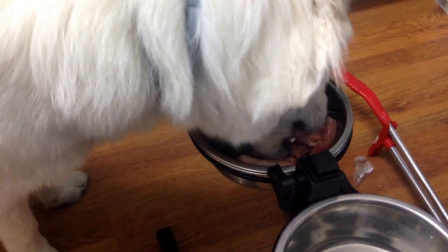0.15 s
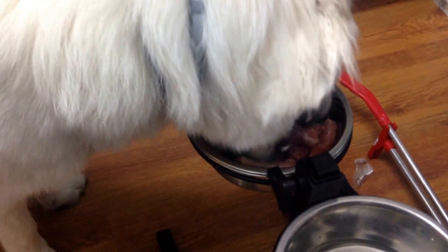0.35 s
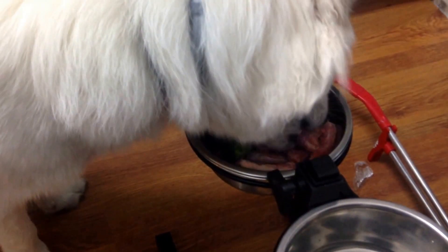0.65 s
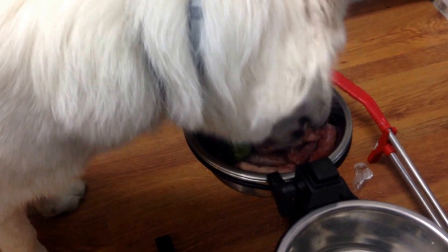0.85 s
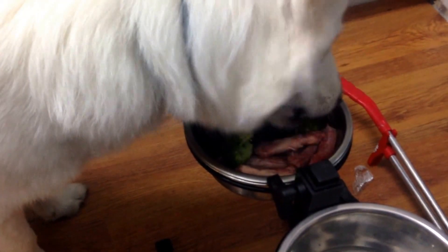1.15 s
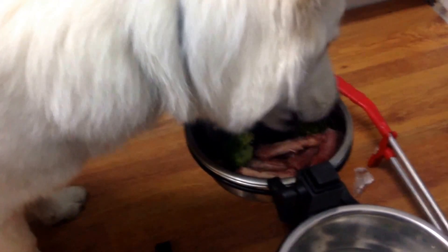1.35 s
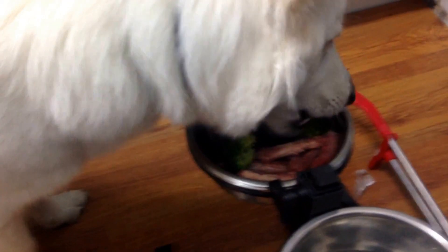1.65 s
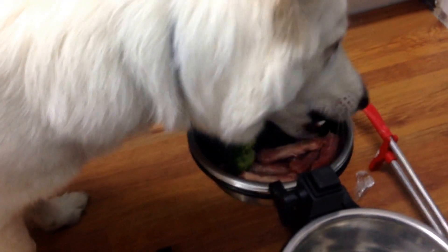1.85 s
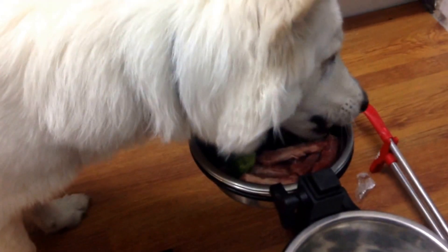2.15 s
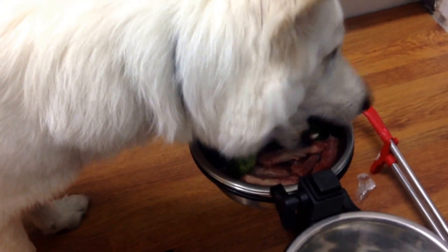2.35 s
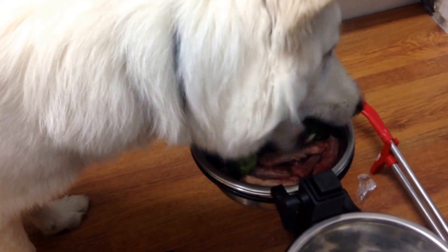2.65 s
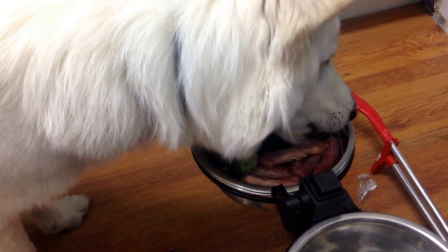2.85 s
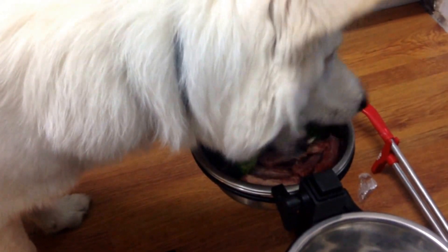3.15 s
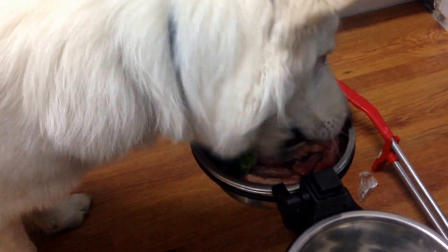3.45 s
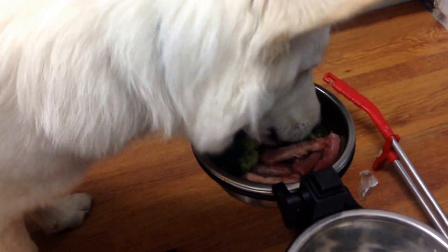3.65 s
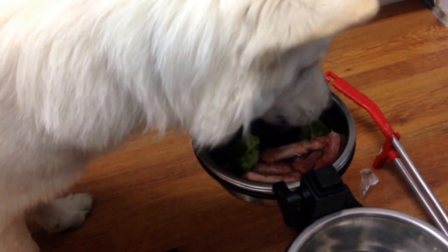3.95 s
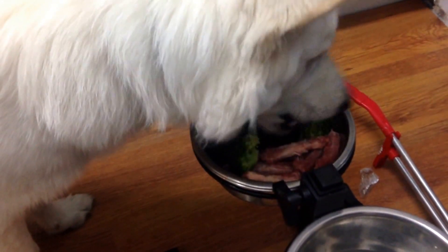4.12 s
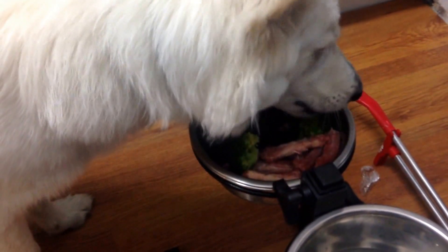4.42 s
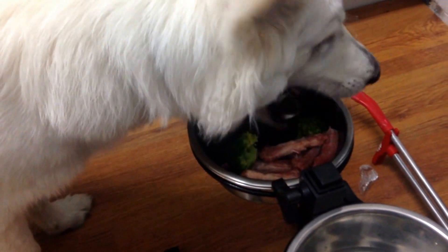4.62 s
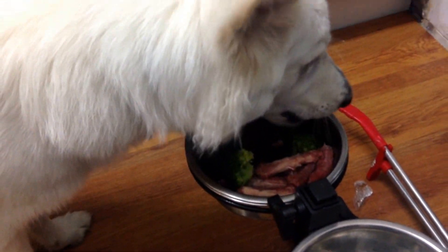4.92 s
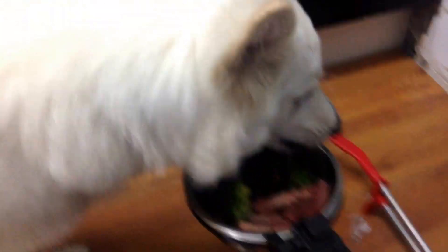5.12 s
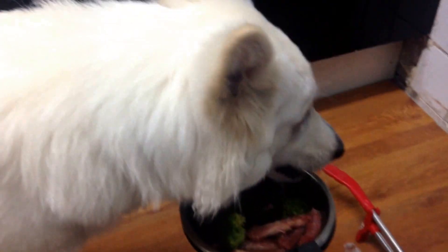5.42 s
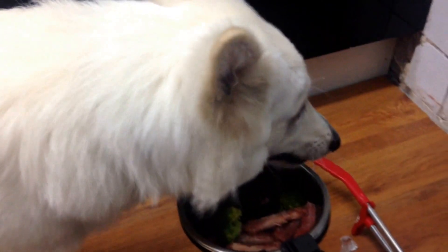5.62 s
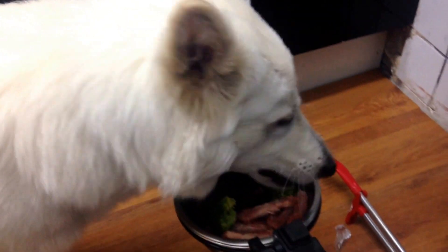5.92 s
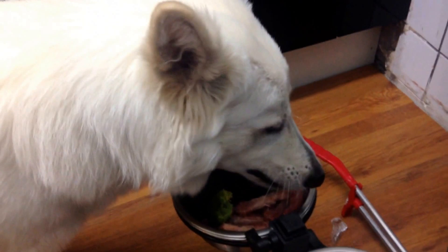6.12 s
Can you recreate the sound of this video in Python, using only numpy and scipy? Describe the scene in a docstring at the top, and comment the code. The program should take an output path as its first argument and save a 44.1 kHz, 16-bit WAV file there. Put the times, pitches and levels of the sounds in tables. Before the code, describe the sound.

A dog eats moist raw meat from a steel bowl on a wooden floor, close up in a small, hard, briefly reverberant room. Steady soft hiss and low room air lie beneath. From 0 to 1.6 s the mouthing is quiet and sparse: fine wet crackle, light lip clicks, faint bumps and hollow tongue pops at about 0.4, 0.8, 1.2 and 1.4 s. At 1.9-2.2 s sharper wet snaps arrive, strongest at 2.1. After a lull, a dense run of juicy bites with a pop fills 2.8-3.1 s. Small ticks and smacks follow until 4.45 s, when one hollow pop and snap bursts out, by far the loudest, followed by dull low thumps around 4.65 s. Soft mouthing resumes; quick crisp bites cluster at 5.4-5.7 s, then two wet snaps near 6.05 and 6.13 s and soft low bumps close it. The bowl rings only faintly.

```python
"""Dog eating raw meat from a steel bowl

A dog eats from a steel bowl on a wooden floor, heard from close by in a small hard room.
Bites are noise clicks shaped by a filter, with damped resonances of the mouth cavity and jaw.
Suction pops, small tongue smacks and dull bumps are damped resonances too; the moist food crackles
as a dense shower of tiny ones. The bowl rings faintly as a bank of decaying modes, two sets of
dense decaying reflections form the room, and filtered noise makes the steady hiss."""
import sys
import numpy as np
from scipy import signal
from scipy.fft import rfft, irfft
from scipy.io import wavfile

SR = 44100
rng = np.random.default_rng(int(sys.argv[2]) if len(sys.argv) > 2 else 0)


def waveform_to_disk(signal):
    """Save audio, clipped to [-1, 1], as 16-bit WAV at the path in sys.argv[1]."""
    frames = np.transpose(np.atleast_2d(signal))
    scaled = np.clip(frames, -1, 1) * 32767
    samples = np.round(scaled).astype(np.int16)
    wavfile.write(sys.argv[1], SR, samples)


N = 276948  # length in samples

# Room air and microphone hiss, relative spectral density: frequency_hz, level_db_per_hz
HISS_SPECTRUM = [(18, -23), (35, -6), (62, -0.5), (100, -3), (175, 1), (350, -3.5), (700, -9), (1300, -19),
                 (2200, -14.5), (4300, -11), (7000, -13), (15000, -14.5)]
# Decay time of the room in each band: frequency_hz, t60_s
ROOM_DECAY = [(150, 0.6), (500, 0.23), (1400, 0.41), (3700, 0.34), (9000, 0.31), (15000, 0.21)]
# Relative strength of the room's tail in each band: frequency_hz, level_db
ROOM_STRENGTH = [(150, -2), (350, -0.5), (620, 0), (880, -7), (1250, -3), (1800, -3.5), (2700, -2.5),
                 (4000, -3), (9000, -3), (15000, -5)]
# Modes of the steel bowl, damped by the food in it: pitch_hz, relative_level_db, t60_s
BOWL_MODES = [(818, -26, 0.32), (886, -17.5, 0.49), (1176, -18, 0.37), (1240, -38, 0.9), (1486, -14.5, 0.2),
              (1630, -55, .3), (1850, -23, 0.25), (1850, -21, 0.18), (2170, -16, 0.12), (2850, -22.5, 0.17),
              (4440, -26, 0.23)]
# Dull low bumps: start_s, level_db, pitch_hz, settle_by_20_db_s
BUMP_EVENTS = [(.136, -54, 74, .04), (.241, -62, 240, .04), (.779, -64, 208, .02), (.921, -61, 78, .05),
               (2.169, -56, 200, .04), (4.4505, -50.5, 165, .025), (4.655, -52.5, 310, .05),
               (4.668, -47.5, 190, .14), (4.678, -48.5, 64, .22), (5.875, -58.5, 75, .04),
               (6.095, -56, 54, .35), (6.167, -57.5, 208, .07)]
# Effort of the jaw on the moist food: time_s, level_db
CHEWING_EFFORT = [(0, -77), (.2, -64), (.55, -80), (1.35, -70), (1.7, -77), (2.08, -65), (2.6, -79),
                  (2.8, -66), (3.3, -75), (3.8, -68), (4.1, -70), (4.55, -62.5), (4.98, -72), (5.2, -66.5),
                  (5.47, -69), (5.62, -57), (5.8, -70), (6.28, -62)]
# Relative colour of the crackle: frequency_hz, level_db
CRACKLE_COLOUR = [(750, 2), (900, 3), (1300, -5.5), (1800, 1.5), (3300, -4), (7000, -8.5), (15000, -19.5)]
# Tongue and cheeks pulling free: start_s, level_db, cavity_pitch_hz
POP_EVENTS = [(.371, -49.5, 930), (.7797, -46.5, 876), (1.1686, -52.5, 946), (1.4461, -52, 910),
              (2.754, -60.5, 1350), (2.9048, -48, 1050), (3.476, -64, 906), (3.6034, -58, 1020),
              (4.38, -56.5, 1150), (4.451, -27, 910), (4.828, -59, 1840), (4.856, -59, 940),
              (5.086, -55.5, 1450), (5.957, -60.5, 814)]
# Relative colour of a wet snap: frequency_hz, level_db
SNAP_COLOUR = [(1000, -2), (2000, -0.5), (3500, 1), (5500, 1), (8000, -0.5), (11000, -2), (15000, -5.5)]
# Teeth and lips: start_s, snap_level_db, snap_low_edge_hz, slope_db_per_octave, mouth_pitch_hz
BITE_EVENTS = [ (.1611, -50.5, 1400, -6, 3020), (.451, -54.5, 1400, 3.5, 6100),
               (.704, -59, 1590, -4.5, 850), (.865, -61.5, 2500, -2, 3200), (.999, -61, 1410, -.5, 2850),
               (1.355, -62, 1700, -12, 800), (1.838, -57, 1500, 4, 640), (1.9, -55, 1750, -7.5, 3200),
               (1.9267, -47, 2000, -14.5, 3000), (1.951, -59, 1400, -12, 970),
               (2.0992, -37, 1750, -8.5, 1787), (2.168, -43.5, 1000, -8.5, 940),
               (2.18, -50.5, 1070, -3.5, 860), (2.213, -56, 4000, -13, 4620),
               (2.4541, -52, 3700, -10, 1820), (2.486, -59, 1000, -4, 1780), (2.803, -54, 1500, 14, 1830),
               (2.9159, -42, 1800, -12, 1174), (2.9426, -39, 1200, -6, 1980),
               (2.9505, -34, 1800, -7.5, 1760), (2.966, -46, 1100, -9, 1000),
               (3.008, -41.5, 1100, -9, 1100), (3.034, -51, 1800, -14, 2400), (3.1051, -43, 2300, 0, 2696),
               (3.334, -59, 1470, 1, 4480), (3.549, -58.5, 1500, 0, 4670), (3.673, -56, 3700, -13, 3540),
               (3.9313, -50.5, 2300, -18, 2450), (4.2127, -60.5, 900, -4.5, 3330),
               (4.294, -58, 1540, -3, 1900), (4.4503, -30, 1450, -10.5, 5830),
               (4.4747, -43.5, 1010, -10, 1204), (4.536, -46, 1700, -14, 1850),
               (5.0156, -57.5, 920, -9.5, 886), (5.099, -59, 4060, -5, 1020),
               (5.355, -59.5, 2000, -2, 3570), (5.3926, -57.5, 2950, -9, 2590),
               (5.436, -55, 3040, -15, 3670), (5.494, -60, 950, -9, 1770), (5.547, -46.5, 1600, -8, 2570),
               (5.562, -45, 1400, -6, 1750), (5.596, -50, 3500, -14, 4240), (5.607, -47, 1500, -7, 4090),
               (5.6245, -43, 2400, -12, 4400), (5.704, -55, 1800, -3, 4900),
               (5.7169, -51, 1490, -5.5, 1707), (5.9416, -55, 3900, -14, 3250),
               (6.046, -42.5, 1000, -5, 1505), (6.127, -43.5, 1050, -6, 1700),
               (6.224, -55, 870, -6.5, 1420)]

HISS_DB = -63.5  # RMS level before the band limit
BAND_LIMIT_HZ = 15450
SQUEEZE_DB, SQUEEZE_LAG_S, SQUEEZE_S = -26, .006, .022  # extra crackle, relative to the snap
SMACKS_PER_S, SMACK_DB, SMACK_SPREAD_DB = 7, -2, 6  # relative to the chewing level; full spread
RING_DB, RING_DB_PER_SLOPE = -6.5, .3  # relative to the snap; the duller the snap, the stronger the ring
SECOND_RATIO, SECOND_DB, SECOND_LAG_S = 2.4, -10, .003  # second resonance of the mouth
SOFT_HZ = 5600  # soft tissue damps resonances above this


def amp(db):
    """Amplitude gain is ten to the power of decibels over twenty."""
    return 10 ** (np.asarray(db) / 20)


def read(points, hz):
    """A spectrum table is interpolated along a logarithmic frequency axis."""
    table_hz, value = np.transpose(points)
    return np.interp(np.log(hz + 1), np.log(table_hz), value)


def add(mix, start_s, sound):
    """Superposition: a sound is summed into the mix from its start time."""
    part = mix[round(start_s * SR):][:len(sound)]
    part += sound[:len(part)]


def burst(x, db):
    """Equal energy: a short sound is given the energy of 10 ms at this RMS level."""
    return amp(db) * x * np.sqrt(SR / 100 / np.sum(x ** 2))


def causal(gain):
    """Minimum phase: folding the cepstrum gives a gain spectrum its causal impulse response."""
    cepstrum = irfft(np.log(np.maximum(gain, 1e-5)))
    half = len(cepstrum) // 2
    cepstrum[1:half] *= 2
    cepstrum[half + 1:] = 0
    return irfft(np.exp(rfft(cepstrum)))


def cavity(hz, swell_s, order=2, glide=0):
    """Damped resonance: soft walls let it build up for swell_s, then die; moving walls glide its pitch."""
    u = np.arange(0, 10, 1 / (swell_s * SR))  # time in units of the swell
    turns = hz * swell_s * (u + glide * (u - 1) ** 2 / 2)
    envelope = u ** order * np.exp(-order * u)
    return envelope * np.sin(2 * np.pi * turns)


def scatter(hold_s, fade_s, graininess, size=1024):
    """Multiple scattering: a click breaks into spiky reflections between muzzle, bowl and floor."""
    t = np.arange(size) / SR
    envelope = np.exp(-np.maximum(t - hold_s, 0) / fade_s)
    heights = np.exp(graininess * rng.standard_normal(size))
    spikes = rng.standard_normal(size) * heights * envelope
    spectrum = rfft(spikes)
    flatter = irfft(spectrum / np.sqrt(abs(spectrum)))  # halves the spectrum's range in dB
    return flatter * np.sqrt(envelope)


def hiss():
    """Stationary noise: white noise filtered to the colour of low room air and even microphone hiss."""
    spectrum = rfft(rng.standard_normal(N))
    gain = amp(read(HISS_SPECTRUM, np.fft.rfftfreq(N, 1 / SR)))
    noise = irfft(spectrum * gain, N)
    return amp(HISS_DB) * noise / noise.std()


def room_tail(first_s=.010, taps_per_s=2500):
    """Diffuse decay: dense reflections start after a delay and each band dies at its own speed."""
    taps = rng.choice([-1., 1.], SR) * (rng.random(SR) < taps_per_s / SR)
    hz, t, bands = signal.stft(taps, SR, nperseg=256)
    t60 = read(ROOM_DECAY, hz)[:, None]
    decay = amp(read(ROOM_STRENGTH, hz)[:, None] - 60 * t / t60)
    equal_energy = np.sqrt(2 * np.log(1000) / t60)  # a long decay carries no more energy than a short one
    tail = signal.istft(bands * decay * equal_energy, SR, nperseg=256)[1] / np.linalg.norm(taps)
    return np.r_[np.zeros(round(first_s * SR)), tail]


def room(x, sway_per_s=1.7):
    """Moving source: the head's motion passes the sound between two sets of reflections."""
    angle = 2 * np.pi * sway_per_s * np.arange(N) / SR
    shares = np.cos(angle), np.sin(angle)
    return sum(signal.fftconvolve(x * share, room_tail())[:N] for share in shares)


def bowl(x, ring_db):
    """Modal vibration: whatever sounds in the steel bowl excites its decaying modes faintly."""
    t = np.arange(SR // 2) / SR
    ring = np.zeros(len(t))
    for hz, db, t60 in BOWL_MODES:
        mode = amp(-60 * t / t60) * np.sin(2 * np.pi * hz * t)
        ring += amp(db) * mode / np.linalg.norm(mode)
    return amp(ring_db) * signal.fftconvolve(x, ring)[:N]


def bumps(thuds=12, cycles=0.9, gap_cycles=3.2, wander_octaves=.35):
    """Repeated impact: a soft thud recurs unevenly and ever weaker as it settles."""
    out = np.zeros(N)
    for start_s, db, hz, settle_s in BUMP_EVENTS:
        gap_s = gap_cycles / hz
        for k, (late, detune) in enumerate(rng.uniform(-1, 1, size=(thuds, 2))):
            loose = min(k, 1)  # only the repeats stray in time and pitch
            age_s = (k + .3 * late * loose) * gap_s
            pitch_hz = hz * 2 ** (wander_octaves * detune * loose)
            thud = cavity(pitch_hz, swell_s=cycles / pitch_hz, order=1)
            add(out, start_s + age_s, burst(thud, db - 20 * age_s / settle_s))
    return out


def chewing(t):
    """Effort envelope: the working of the jaw at time t, interpolated in dB."""
    return np.interp(t, *np.transpose(CHEWING_EFFORT))


def crackle(per_s=500, spread_db=3.0, low_hz=750, octaves=4):
    """Bursting films: saliva and meat juice crackle as the jaw works, and more around each bite."""
    out, t = np.zeros(N), np.arange(N) / SR
    for when, pitch, weight, length in rng.random((int(per_s * N / SR), 4)):
        hz = low_hz * 2 ** (octaves * pitch)
        grain = cavity(hz, swell_s=(.5 + 2 * length) / hz, order=1)
        size_db = spread_db * min(-np.log(weight), 2) + read(CRACKLE_COLOUR, hz)
        # pitches lie evenly per octave; the root of hz evens out the energy per hertz
        add(out, when * N / SR, burst(grain, size_db) * np.sqrt(hz))
    out = signal.oaconvolve(out, scatter(hold_s=0.0046, fade_s=0.0014, graininess=1.0))[:N]
    squeeze = np.zeros(N)
    for start_s, snap_db, *_ in BITE_EVENTS:
        distance_s = abs(t - start_s - SQUEEZE_LAG_S)
        squeeze += amp(snap_db + SQUEEZE_DB) * np.exp(-distance_s / SQUEEZE_S)
    return out / out.std() * np.hypot(amp(chewing(t)), squeeze)


def smacks(low_hz=880, octaves=1.8, cycles=2.0):
    """Random small resonances: the tongue smacks at random, louder while the jaw works harder."""
    out = np.zeros(N)
    for k, (when, pitch, weight) in enumerate(rng.random((int(SMACKS_PER_S * N / SR), 3))):
        start_s = (k + when) / SMACKS_PER_S  # one in each equal stretch of time
        hz = low_hz * 2 ** (octaves * pitch ** 2)
        db = chewing(start_s) + SMACK_DB + SMACK_SPREAD_DB * (weight - .5)
        add(out, start_s, burst(cavity(hz, swell_s=cycles / hz), db))
    return out


def pops(cycles=2.6, overtone_db=-19, overtone=2.38, echo_s=0.0079, echo_db=-11,
         after_s=.02, after_db=-19, after_pitch=.95):
    """Suction release: the mouth rings with a weak overtone, a floor echo and a lower after-pop."""
    out = np.zeros(N)
    for start_s, db, hz in POP_EVENTS:
        swell_s = cycles / hz
        pop = burst(cavity(hz, swell_s, glide=rng.uniform(-0.097, 0.11)), db)
        add(out, start_s, pop)
        add(out, start_s + echo_s, amp(echo_db) * pop)
        add(out, start_s, burst(cavity(hz * overtone, swell_s=0.0013), db + overtone_db))
        add(out, start_s + after_s, burst(cavity(hz * after_pitch, swell_s), db + after_db))
    return out


def softness(hz):
    """Tissue damping: the share of a mouth resonance that soft tissue lets ring."""
    return 1 / (1 + (hz / SOFT_HZ) ** 8)


def bites(knock_db=-21, knock_hz=220, knock_s=.0026, ring_s=0.0041, lumps_db=4.0, flesh_db=-24, size=2048):
    """Source and filter: a scattered wet snap excites two short mouth rings and a faint jaw knock."""
    out, hz = np.zeros(N), np.fft.rfftfreq(size, 1 / SR) + 1
    knots = np.geomspace(700, 16000, 30)
    flesh = amp(flesh_db) / (1 + (hz / 1500) ** 2)  # soft tissue adds a dull share under the edge
    for start_s, snap_db, edge_hz, slope_db, mouth_hz in BITE_EVENTS:
        low_cut = 1 / np.sqrt(1 + (edge_hz / hz) ** 8)
        tilt_db = read(SNAP_COLOUR, hz) + slope_db * np.log2(np.maximum(hz / edge_hz, .5))
        # the mouth has another shape at every bite
        lumps = np.interp(hz, knots, rng.standard_normal(len(knots)))
        colour = causal(low_cut * amp(tilt_db + lumps_db * lumps) + flesh)
        click = scatter(hold_s=.0065, fade_s=.0065, graininess=.7)
        add(out, start_s, burst(signal.fftconvolve(click, colour), snap_db))

        # a small cavity rings higher and shorter; ring_s holds at 900 Hz
        swell_s = ring_s * (900 / mouth_hz) ** .75
        ring = cavity(mouth_hz, swell_s, glide=.04 * rng.choice([-1, 1]))
        ring_db = snap_db + RING_DB - RING_DB_PER_SLOPE * slope_db
        add(out, start_s, softness(mouth_hz) * burst(ring, ring_db))

        second_hz = SECOND_RATIO * mouth_hz
        second = burst(cavity(second_hz, swell_s=.001), snap_db + SECOND_DB)
        add(out, start_s + SECOND_LAG_S, softness(second_hz) * second)

        knock = cavity(knock_hz, swell_s=knock_s)
        add(out, start_s, burst(knock, snap_db + knock_db))
    return out


def scene():
    """Superposition: the mouth works inside the bowl, the room answers and the hiss lies beneath."""
    mouth = bites() + pops() + smacks() + crackle()
    near = mouth + bowl(mouth, ring_db=-20) + bumps()
    return (near + room(near) + hiss())[None]


def record(dry):
    """Band limiting: the recorder's steep low-pass filter removes the highest treble."""
    low_pass = signal.firwin(767, BAND_LIMIT_HZ, window=("kaiser", 8), fs=SR)
    return signal.oaconvolve(dry, low_pass[None], "same")


dry = scene()
out = record(dry)
waveform_to_disk(out)
```